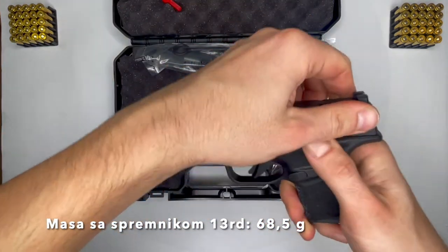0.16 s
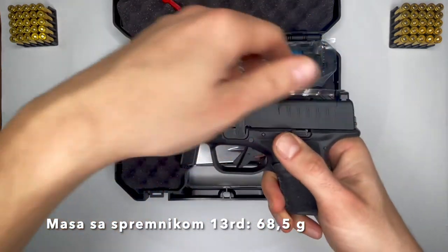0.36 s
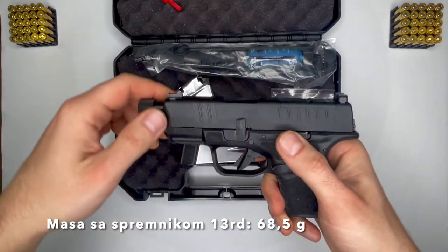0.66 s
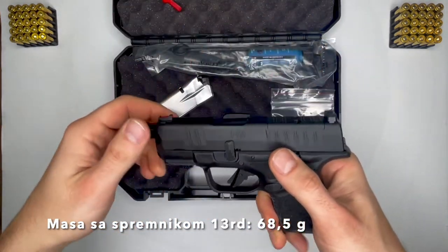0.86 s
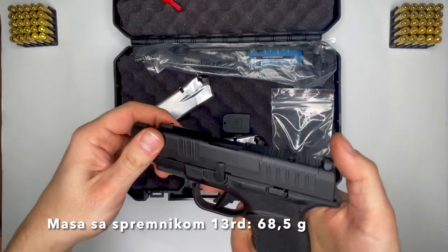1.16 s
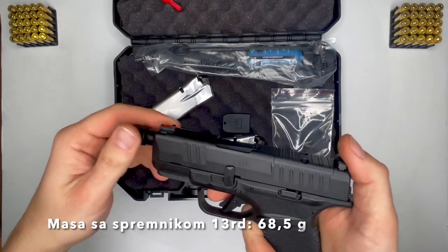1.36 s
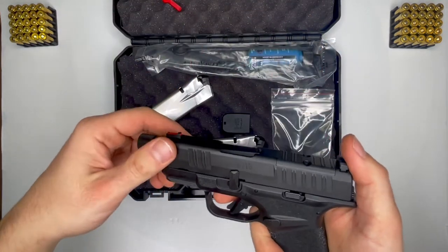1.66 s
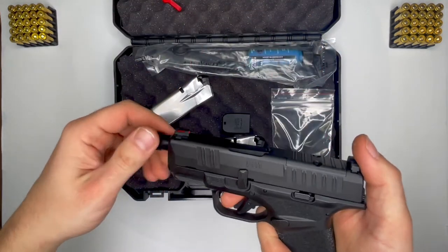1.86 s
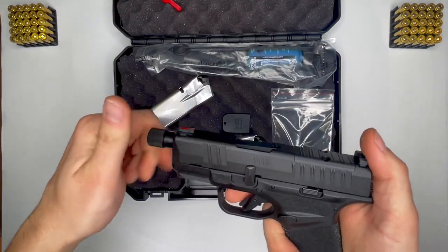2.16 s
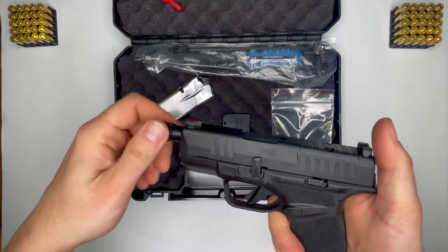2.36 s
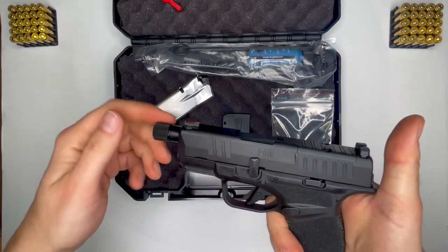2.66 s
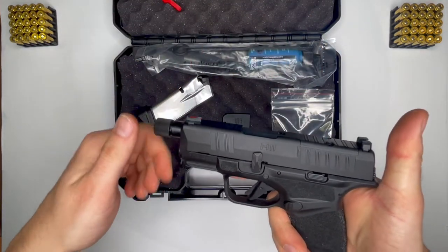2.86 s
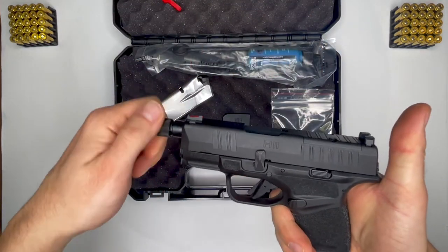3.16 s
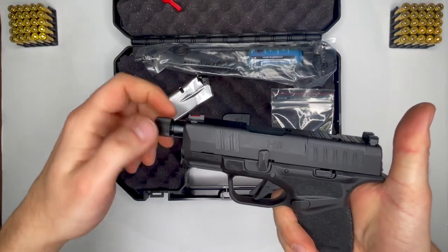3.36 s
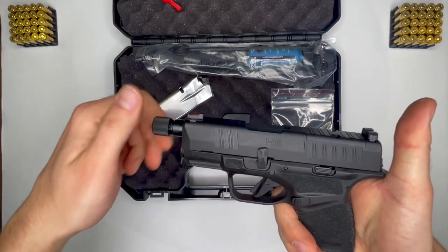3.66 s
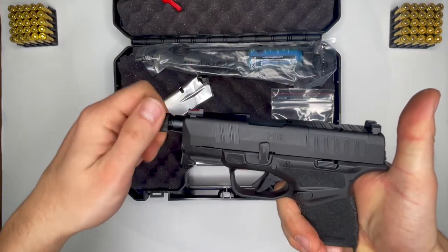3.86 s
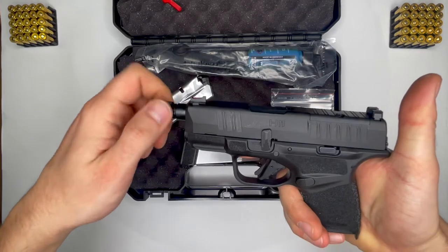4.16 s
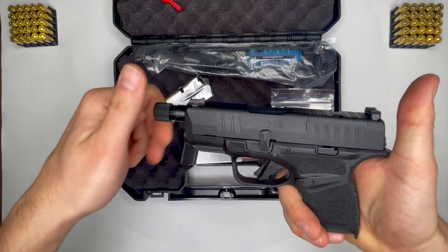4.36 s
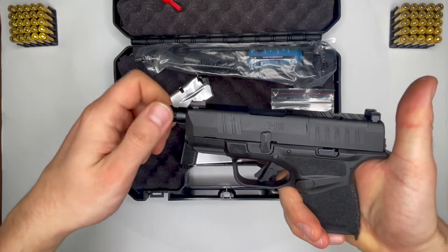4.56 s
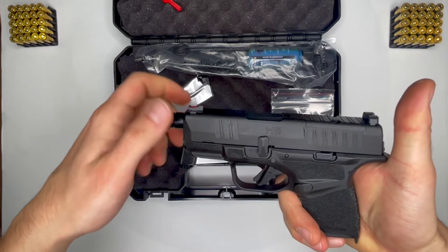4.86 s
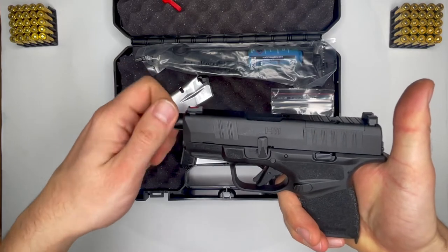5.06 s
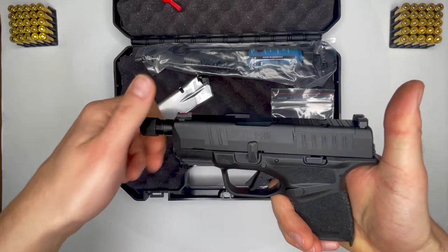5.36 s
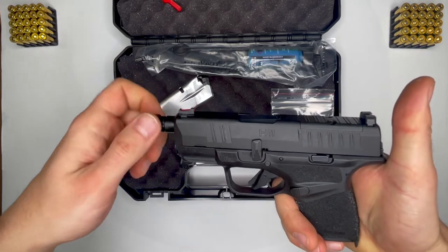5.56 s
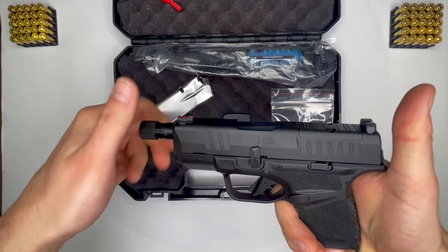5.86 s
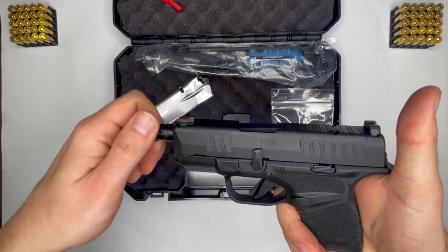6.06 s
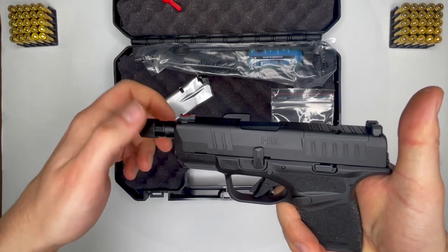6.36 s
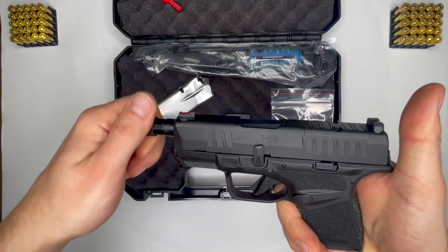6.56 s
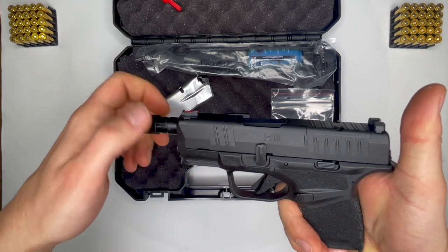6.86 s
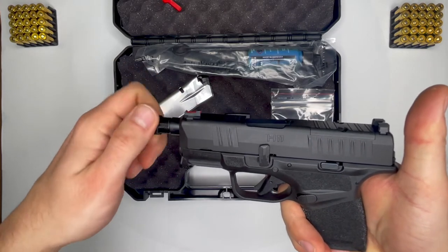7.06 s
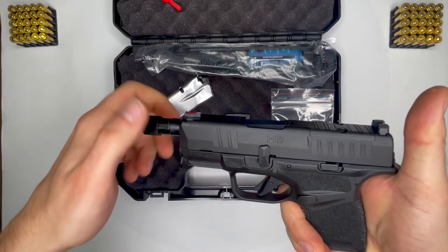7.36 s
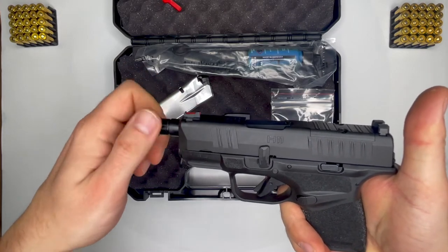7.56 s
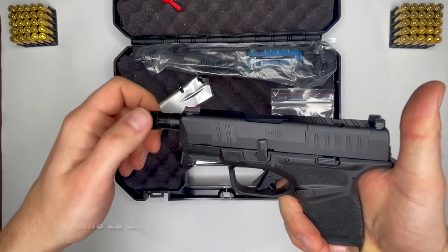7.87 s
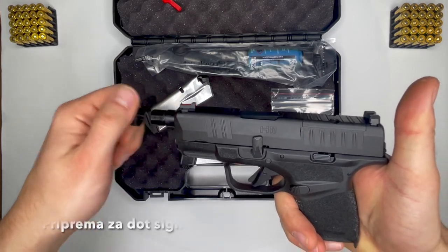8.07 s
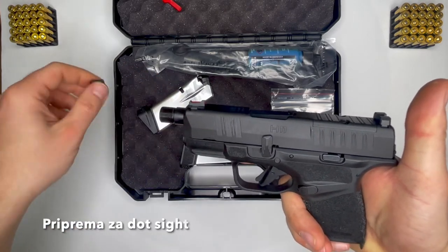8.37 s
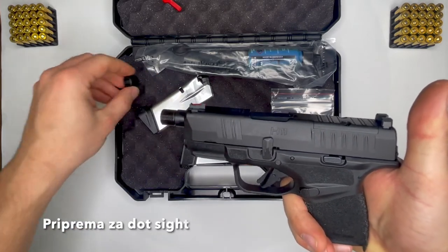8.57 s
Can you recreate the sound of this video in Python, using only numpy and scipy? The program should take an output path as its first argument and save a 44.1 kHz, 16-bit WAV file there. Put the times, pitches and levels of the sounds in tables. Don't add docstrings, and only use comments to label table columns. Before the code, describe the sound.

A steel slide slams home and rattles, then a small knurled cap unscrews in short, gritty, scraping twists with tiny ticks in a quiet room.

```python
import sys
import numpy as np
from scipy import signal
from scipy.fft import rfft, irfft, next_fast_len
from scipy.io import wavfile
from scipy.ndimage import uniform_filter1d, map_coordinates

SR = 44100
rng = np.random.default_rng(int(sys.argv[2]) if len(sys.argv) > 2 else 0)


def generate_wav(sig):
    pcm = np.round(np.clip(np.atleast_2d(sig).T, -1, 1) * 32767).astype(np.int16)
    wavfile.write(sys.argv[1], SR, pcm)


def gain_from_decibels(decibels):
    exponent = np.asarray(decibels, float) / 20
    return 10 ** exponent


N = 384111

# f/Hz, width/Hz, level/dB
BARREL_MODES = [(1175, 210, -6.5), (1448, 200, -6.5), (1723, 150, -3.5), (2071, 110, 2), (2210, 110, -1),
                (2443, 97, -0.5), (2906, 130, -3.5), (3200, 490, -11.5)]
# f/Hz, width/Hz, level/dB
THREAD_MODES = [(3937, 150, 0.5), (4290, 220, -3.5), (4990, 500, -3), (5660, 300, 1), (6575, 370, -3.5)]
# f/Hz, width/Hz, level/dB
GRIT_MODES = [(7856, 330, -6.5), (8710, 400, -3), (9330, 260, 0.5), (9960, 250, 0), (10440, 400, -1),
              (11300, 720, -8.5)]


def unit(x):
    return x / np.sqrt(np.mean(x ** 2) + 1e-20)


def along(points, hz):
    f, v = np.transpose(points)
    return np.interp(np.log(hz + 1), np.log(f + 1), v)


def curves(rows, rest=None):
    s, *cols = np.transpose(rows)
    return np.array([np.interp(np.arange(N) / SR, s, c, rest, rest) for c in cols])


def wobble(rate):
    knots = rng.standard_normal(int(N * rate / SR) + 4)
    return map_coordinates(knots, [np.arange(N) * rate / SR])


def filtered(x, response):
    m = next_fast_len(N + SR // 8, True)
    return irfft(rfft(x, m) * response(np.fft.rfftfreq(m, 1 / SR)), m)[..., :N]


def body(modes):
    def ring(f):
        total = 0
        for k, (centre, width, db) in enumerate(modes):
            damping = 1j * f * width
            total = total + (-1) ** k * gain_from_decibels(db) * damping / (centre * centre - f * f + damping)
        return total

    power = np.mean(abs(ring(np.linspace(1, SR / 2, 4000))) ** 2)
    return lambda f: ring(f) / np.sqrt(power)


def small_steel(hz):
    return 1 / (1 + (950 / (hz + 1)) ** 8)


def patchy(depth_db, size):
    z = signal.stft(rng.standard_normal((2, N + 512)), nperseg=256)[2]
    field = uniform_filter1d(rng.standard_normal(z.shape[1:]), size[0], 0)
    field = uniform_filter1d(field, size[1], 1)
    return unit(signal.istft(z * gain_from_decibels(depth_db * unit(field)), nperseg=256)[1][:, :N])


def swells(rows, layers_db):
    squareness = 2.1
    power = np.zeros((len(layers_db[0]), N))
    for (s, half, *_), db in zip(rows, layers_db):
        start = max(round((s - 3 * half) * SR), 0)
        near = np.arange(start, min(round((s + 3 * half) * SR), N))
        bell = np.exp(-2 * abs((near / SR - s) / half) ** squareness)
        power[:, near] += gain_from_decibels(2 * np.array(db))[:, None] * bell
    return power


def pressure():
    # full speed t/s, hold/s, barrel level/dB, drift over hold/dB, grit over barrel/dB
    turns = [(0.911, 0.064, -55, -4.5, -2), (1.031, 0.15, -65, 6.5, -4.5), (1.907, 0.063, -48, -7.5, 6.5),
             (1.991, 0.08, -60, 0, 7.5), (2.107, .1, -72, -5, -2), (2.318, 0.1, -51.5, 4.5, -1),
             (2.67, 0.081, -60.5, 7.5, -3.5), (3.04, 0.13, -59, 8, 2.5), (3.423, .13, -48.5, -4, 0.5),
             (3.798, 0.11, -49.5, -5, -0.5), (4.132, 0.12, -45.5, -3, -3.5), (4.519, 0.15, -48.5, -8, 0.5),
             (4.987, 0.045, -58.5, 9, 1), (5.05, 0.14, -44, -9, -5), (5.201, 0.12, -59, -14.5, -4.5),
             (5.538, 0.18, -46, 1, -3.5), (5.741, 0.058, -58, -15.5, -1.5), (6.001, 0.18, -52.5, -4.5, 4),
             (6.446, 0.17, -56.5, 3, 3), (6.621, 0.059, -57, -9.5, -5.5), (6.945, 0.26, -58.5, 3, 2.5),
             (7.478, .21, -57.5, 9, 0.5), (7.867, 0.075, -53, 3.5, -5), (8.67, .06, -66.5, -1, -1)]
    # t/s, half width/s, barrel level/dB
    binds = [(2.362, 0.025, -45.5), (3.111, 0.01, -48), (3.135, 0.0089, -46.5), (3.451, 0.019, -39),
             (3.491, 0.035, -38), (3.748, 0.0043, -64.5), (3.782, 0.015, -47), (3.859, 0.034, -47),
             (4.11, .006, -59.5), (4.151, 0.014, -40), (4.21, 0.0063, -55), (4.266, 0.026, -41.5),
             (4.494, 0.0052, -49.5), (4.518, 0.0098, -38.5), (4.601, 0.02, -41.5), (4.699, 0.037, -49.5),
             (4.972, .014, -47.5), (5.01, 0.0067, -45), (5.057, 0.0078, -47), (5.079, 0.028, -42.5),
             (5.14, 0.033, -44), (5.562, 0.034, -41.5), (5.63, 0.025, -38), (5.704, 0.021, -47),
             (6.028, 0.0045, -55), (6.489, 0.04, -53.5), (6.577, 0.012, -49.5), (6.963, 0.0094, -48),
             (7.685, 0.014, -45), (7.906, 0.0087, -41.5)]
    # t/s, half width/s, barrel level/dB
    touches = [(1.005, .015, -70.5), (1.058, .012, -62.5), (1.268, .01, -75.5), (1.293, 0.012, -78),
               (1.375, 0.022, -76), (1.607, 0.0037, -74), (2.288, 0.0068, -71), (2.725, 0.027, -49),
               (2.756, 0.014, -44), (2.885, 0.019, -81.5), (3.277, 0.0085, -77.5), (4.38, .015, -79),
               (4.805, 0.014, -82), (5.47, .03, -80), (6.265, 0.026, -80.5), (6.76, .022, -77.5),
               (7.524, .005, -49.5), (7.597, 0.016, -48), (7.085, 0.011, -52.5), (7.182, 0.012, -58)]
    attack_db_per_s, release_db_per_s, thread_under_grit_db = 1392, 633, 5
    power = swells(binds, [(db, db - 12.5, db - 9.5) for *_, db in binds])
    power += swells(touches, [(db, db - 6, db + 3) for *_, db in touches])
    for s, hold, db, drift_db, grit_db in turns:
        near = np.arange(round((s - .1) * SR), min(round((s + hold + .2) * SR), N))
        t = near / SR - s
        shape_db = db + drift_db * np.clip(t / hold, 0, 1)
        shape_db += attack_db_per_s * np.minimum(t, 0)
        shape_db -= release_db_per_s * np.maximum(t - hold, 0)
        power[:, near] += gain_from_decibels(2 * (shape_db + [[0], [grit_db - thread_under_grit_db], [grit_db]]))
    return np.sqrt(power)


def twists():
    # t/s, lowest barrel modes level/dB, highest barrel modes level/dB, thread level/dB
    grips = [(0.801, -3.5, 2.5, 6), (1.799, -5.5, 7, -2.8), (2.271, -8, -0.7, 0.4), (2.6, -4, 0.6, 2),
             (2.95, -3.5, -2, 0.9), (3.3, -5, 5, 2.5), (3.7, 0.4, -0.7, 0.5), (4.05, -0.6, -0.5, 1.7),
             (4.4, 3, -0.3, 1.5), (4.9, -1, 0.2, 0.8), (5.4, 0.3, -1, -1), (5.9, -2, 0, -2.8),
             (6.35, -1.5, 1, -0.2), (6.85, -1.5, -1.5, -3.2), (7.4, -0.3, 1.5, 0.7), (7.8, -1.5, -3, 4.06),
             (8.5, 10.5, 2, 3.5)]
    barrel, thread, gritty = pressure()
    catches = (rng.random(N) < 1000 / SR) * gain_from_decibels(16 * rng.random(N))
    lumps = gain_from_decibels(1.07 * wobble(45) + 0.92 * wobble(170))
    scrape = patchy(depth_db=3.5, size=(2, 14))
    rub = unit(lumps * (scrape + 0.384 * unit(catches) * [[1], [-1]]))

    s, low_db, high_db, thread_db = np.transpose(grips)
    grip = np.maximum(np.searchsorted(s, np.arange(N) / SR) - 1, 0)

    def steel(level_db, modes):
        return filtered(gain_from_decibels(level_db) * barrel * rub, lambda hz: small_steel(hz) * body(modes)(hz))

    low = steel(low_db[grip] - 9.0, BARREL_MODES[:2])
    core = steel(-1.0, BARREL_MODES[2:6])
    high = steel(high_db[grip] - 6.5, BARREL_MODES[6:])
    screw = filtered(gain_from_decibels(thread_db[grip]) * thread * rub, body(THREAD_MODES))
    grit = filtered(gain_from_decibels(1.5) * gritty * rub, lambda hz: body(GRIT_MODES)(hz) / (1 + (hz / 11300) ** 24))
    return low + core + high + screw - grit


def knocks():
    # t/s, peak level/dB, bright over peak/dB, thud over peak/dB, t60/s
    contacts = [(0.0, -13, -8.5, -23, 0.028), (.0034, -16, -1.5, -13.5, 0.0085),
                (.0074, -16.5, -11.5, -31, 0.011), (.0631, -31, -16, -42.5, 0.013),
                (.0759, -29, -14, -23, 0.026), (.0806, -30, -4, -30, 0.0088), (.0897, -25, -10, -32, 0.028),
                (.0947, -34, -18, -28, .016), (.1004, -26.5, -20.5, -24, 0.01),
                (0.2123, -46, -22, -21, .012), (0.2157, -22, -16.5, -14.5, 0.02),
                (.9232, -33.5, -11, -40, 0.0088), (.9258, -34, -4.5, -40, 0.013),
                (6.930, -51, -11, -44, 0.012), (7.0684, -50, 1.5, -47.5, .007),
                (7.7129, -33.5, -7.5, -39.5, 0.013), (7.7294, -43, -7.5, -44, 0.024),
                (7.9414, -38, -33, -53, 0.015), (7.9523, -26.5, -27.5, -50, 0.0089),
                (7.9553, -26, -27, -45, 0.018)]
    # f/Hz, width/Hz, level/dB
    frame_modes = [(243, 160, -2.5), (560, 420, -2)]
    t = np.arange(SR // 20) / SR
    blows = np.zeros((3, 2, N + len(t)))
    t60_ratio = np.array([[[1]], [[.9]], [[.4]]])
    for s, db, bright_db, thud_db, t60 in contacts:
        fade = gain_from_decibels(-60 * t / (np.clip(t60, .003, .05) * t60_ratio))
        burst = gain_from_decibels(db) * fade * rng.standard_normal((3, 2, len(t)))
        mix = gain_from_decibels([[[-5]], [[bright_db + 9.0]], [[thud_db + 3.0]]])
        blows[..., round(s * SR):][..., :len(t)] += burst * mix

    def struck(blow, modes):
        damped = [(hz, 2.5 * width, db) for hz, width, db in modes]
        return filtered(blow[:, :N], body(damped))

    bright_modes = THREAD_MODES + [(hz, width, db + 10) for hz, width, db in GRIT_MODES]
    metal = struck(blows[0], BARREL_MODES) + struck(blows[1], bright_modes)
    metal = filtered(metal, lambda hz: small_steel(hz) / (1 + (hz / 11200) ** 8))
    return struck(blows[2], frame_modes) + metal


def palm():
    # t/s, level/dB
    stroke = [
        (0, -62),
        (.2, -67.5),
        (.27, -79),
        (.35, -74.5),
        (.55, -77.5),
        (.72, -84),
        (.89, -81),
    ]
    # f/Hz, width/Hz, level/dB
    skin = [(2112, 200, -2.5), (4300, 390, 0.23), (6500, 520, -8.5), (9800, 320, -5.5)]
    drag = gain_from_decibels(curves(stroke, rest=-150)[0] + 5.0 * wobble(13))
    return filtered(drag * rng.standard_normal((2, N)), body(skin))


def walls(x):
    # f/Hz, t60/s
    decay = [(300, 0.14), (2500, 0.38), (10000, .25)]
    hz, t, z = signal.stft(rng.standard_normal((2, SR // 2)), SR, nperseg=256)
    tail = signal.istft(z * gain_from_decibels(-60 * t / along(decay, hz)[:, None]), SR, nperseg=256)[1]
    late = np.pad(x, ((0, 0), (250, 0)))
    return signal.fftconvolve(late, tail / np.linalg.norm(tail[0]), axes=1)[:, :N]


def background():
    # closest t/s, half width/s, deep rumble level/dB, upper rumble level/dB, tyre level/dB
    passes = [(.4, 0.29, -66.5, -72.5, -70.5), (.95, 0.45, -59.5, -73.5, -74),
              (2.05, 0.16, -66, -71, -66.5), (2.6, 0.43, -69.5, -72, -71), (3.35, .3, -73, -70.5, -78),
              (4.1, 0.86, -78.5, -73.5, -84.5), (4.95, 0.33, -74, -74.5, -89.5),
              (5.75, 0.5, -72, -70.5, -69.5), (6.7, .35, -81, -71.5, -83), (7.45, 0.24, -67, -63, -80),
              (8.0, .28, -75.5, -70, -90), (8.7, .25, -65, -65.5, -80.5)]
    # level/dB of deep rumble, upper rumble, tyre roar
    calm_db = [-84, -84, -94]
    # f/Hz, width/Hz, level/dB
    room_modes = [
        [(26.98, 45, -3.5), (49, 8.8, 3)],
        [(67.5, 15, -0.8), (129, 35, -10), (198, 18, -6)],
    ]
    # f/Hz, density/dB per Hz
    roar = [(150, -25), (260, -3.5), (420, -2.5), (600, -10.5), (850, -29.5)]
    # f/Hz, density/dB per Hz
    hiss = [(80, -21.5), (120, 15), (500, 10.5), (750, 9.5), (1000, 5.5), (1600, -2.5), (2400, -0.5),
            (4200, -3.5), (5200, -7.5), (8000, -4.5), (10200, -1.5), (11500, -8.5), (13000, -13),
            (15000, -63)]
    power = swells(passes, [row[2:] for row in passes])
    deep, upper, tyres = np.sqrt(power + gain_from_decibels(2 * np.array(calm_db))[:, None])
    air = patchy(depth_db=0.5, size=(3, 16))

    def layer(noise, shape):
        return unit(filtered(noise, lambda hz: gain_from_decibels(along(shape, hz))))

    def boom(modes):
        return unit(filtered(air, lambda hz: abs(body(modes)(hz)) ** 2 / (1 + (hz / 260) ** 4)))

    rumble = deep * gain_from_decibels(0.54 * wobble(6)) * boom(room_modes[0])
    rumble += upper * gain_from_decibels(5.0 + .7 * wobble(12.0)) * boom(room_modes[1])
    traffic = tyres * layer(patchy(depth_db=3, size=(1, 16)), roar)
    tone = gain_from_decibels(-72.0 + 0.52 * wobble(4.9)) * layer(air, hiss)
    return traffic, rumble + tone


def stereo_filter(pair, alike):
    # f/Hz, phase/rad
    lag_rad = [(1400, .1), (4000, .9), (4550, 1.9), (5000, 4.3), (5500, 5.8), (6500, 7), (8100, 8.8),
               (8700, 9.2), (9700, 9.5), (10700, 10.8), (11700, 12.3), (12200, 12.57)]
    # f/Hz, level/dB
    lean_db = [(100, 2.05), (2000, 0), (2900, 2), (4000, -1), (4700, -2.5), (6000, -0.2), (12000, -1.26)]

    def response(hz):
        share = np.clip(along(alike, hz), -1, 1)
        lag = gain_from_decibels(-along(lean_db, hz)) * np.exp(-1j * along(lag_rad, hz))
        return lag * [share, np.sqrt(1 - share ** 2)]

    return np.array([pair[0], filtered(pair, response).sum(0)])


def scene():
    # f/Hz, correlation/1
    near_alike = [(300, 0.31), (1200, 0.72), (2200, 1), (2900, 0.76), (3600, .84), (4600, .5), (5500, .92),
                  (6500, 0.73), (7100, 1), (8200, 0.87), (9300, 0.99), (10200, .93), (11200, .74),
                  (12000, 0.94)]
    # f/Hz, correlation/1
    far_alike = [(50, 1), (250, -0.23), (700, -0.94), (1500, 0.16), (4500, -0.071), (6200, .7), (7200, .6),
                 (8600, .92), (9500, 0.92), (10200, .8), (11000, 0.67), (12000, 0.86)]
    gun = twists() + knocks()
    hand = palm()
    traffic, tone = background()
    close = stereo_filter(gun + hand + traffic, near_alike)
    return close + stereo_filter(gain_from_decibels(-21.0) * walls(gun) + tone, far_alike)


def top_cut(x):
    return signal.sosfilt(signal.butter(12, 13400, fs=SR, output="sos"), x)


def record(dry):
    mix = filtered(dry, lambda hz: 1 / (1 + (hz / 13300) ** 12))
    return top_cut(mix)


dry = scene()
out = record(dry)
generate_wav(out)
```